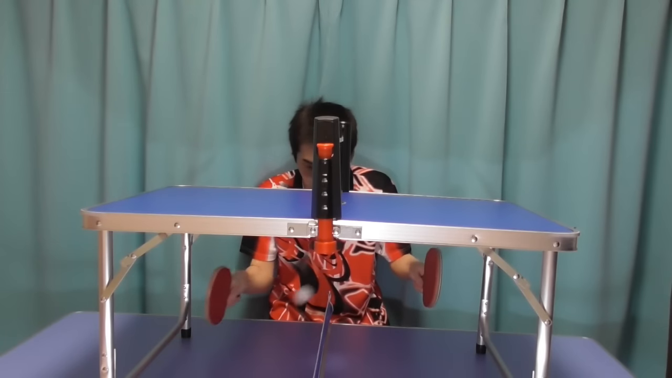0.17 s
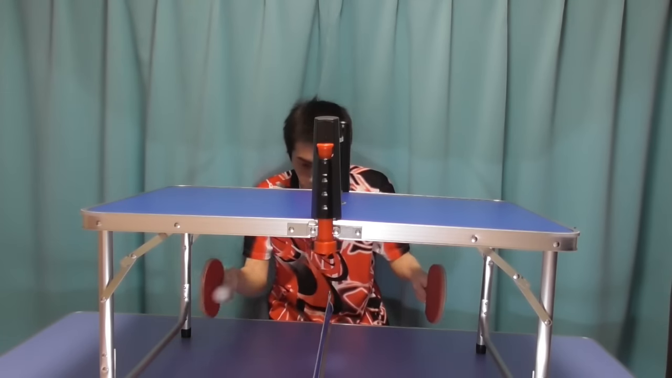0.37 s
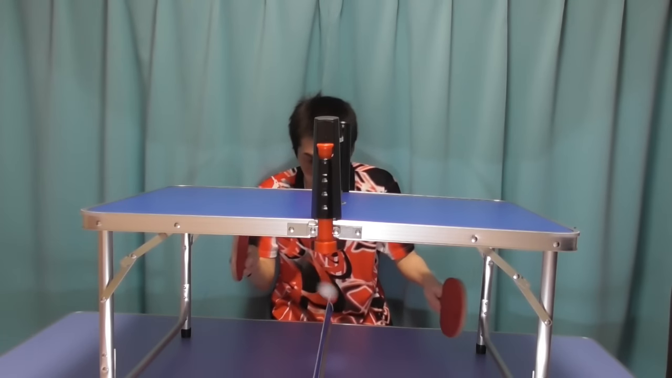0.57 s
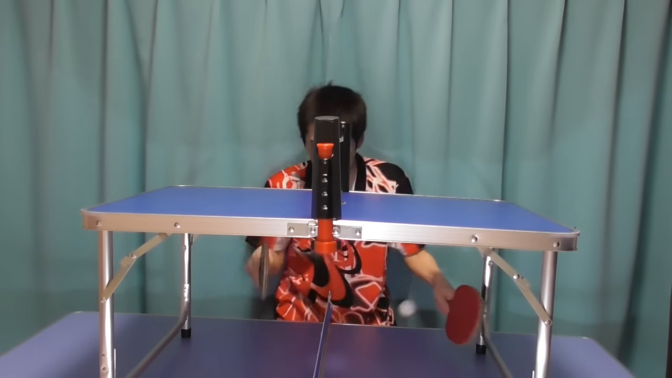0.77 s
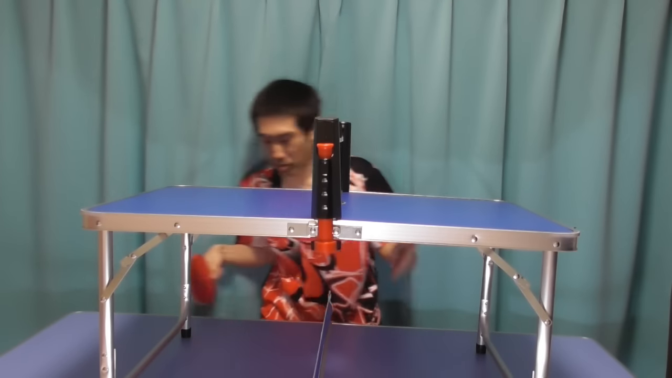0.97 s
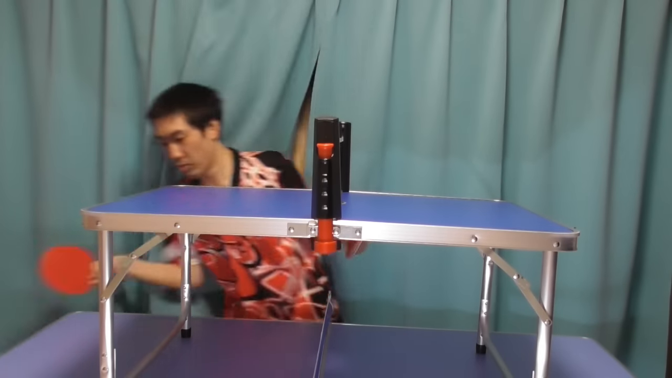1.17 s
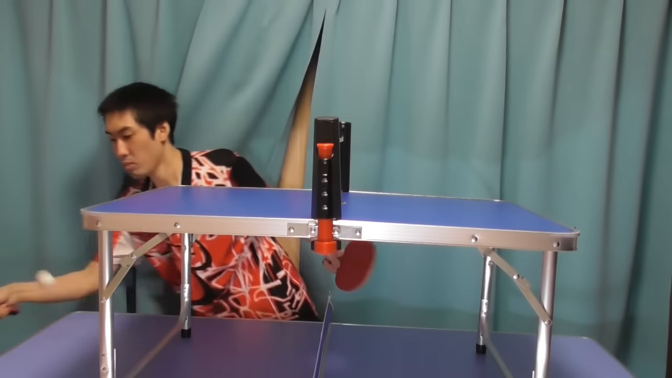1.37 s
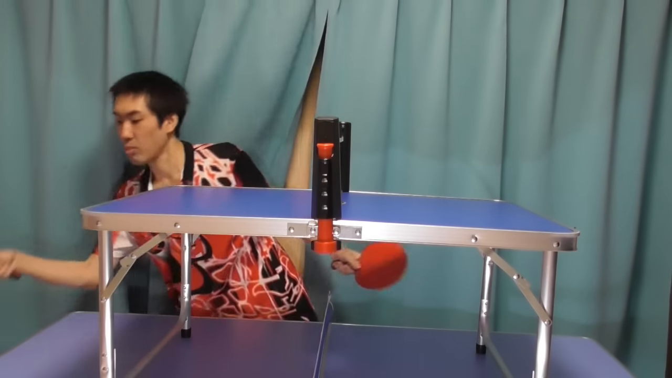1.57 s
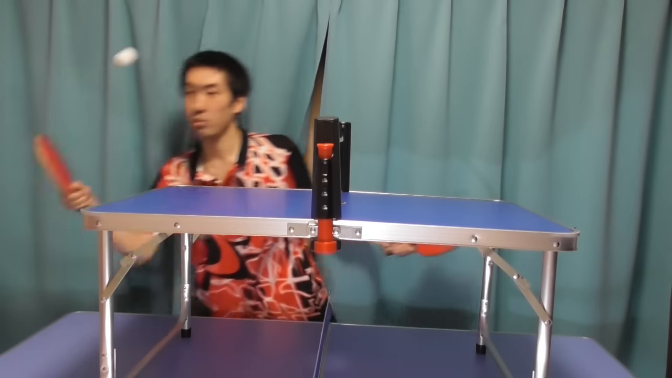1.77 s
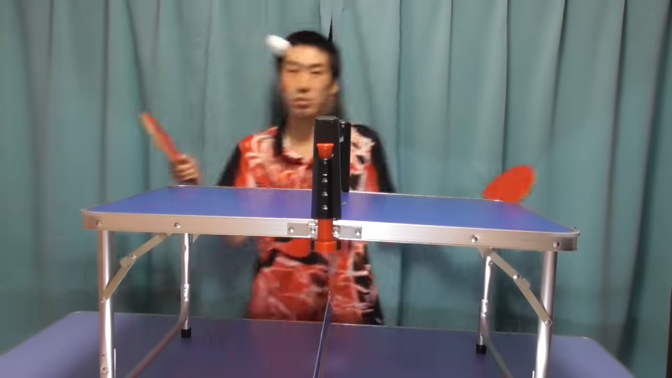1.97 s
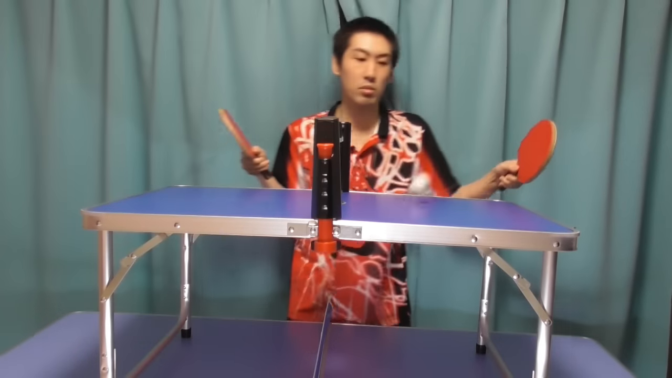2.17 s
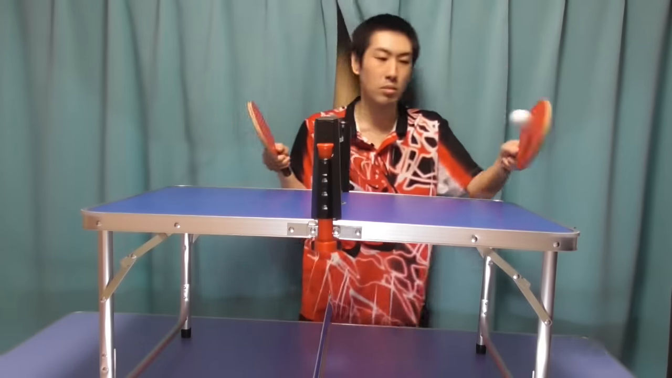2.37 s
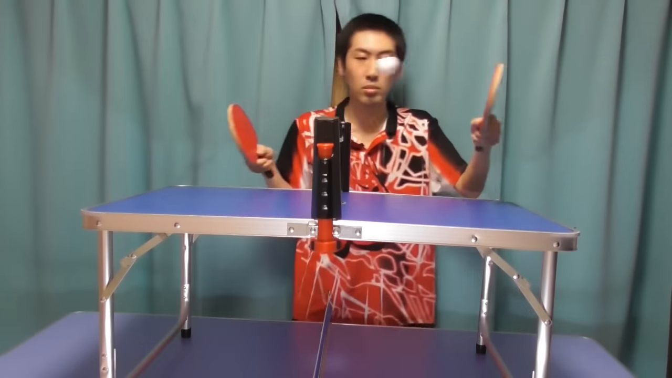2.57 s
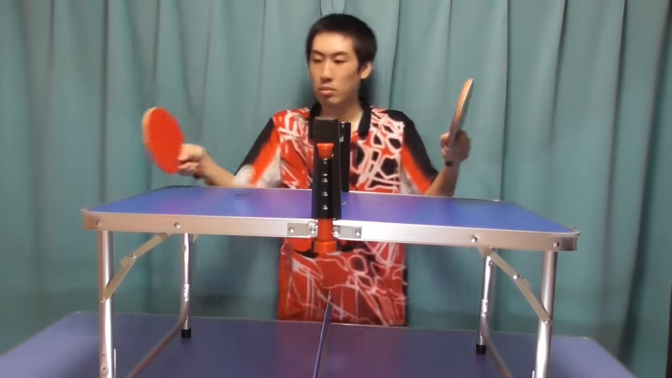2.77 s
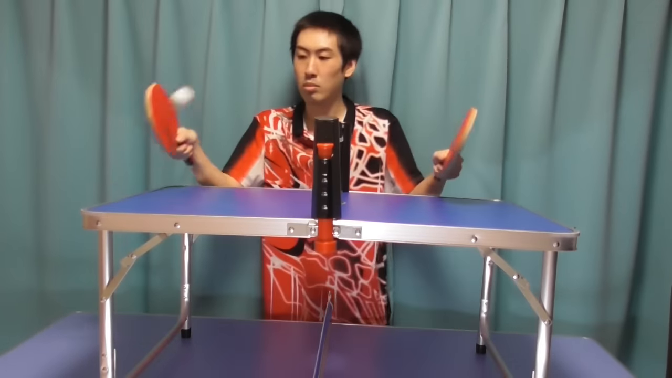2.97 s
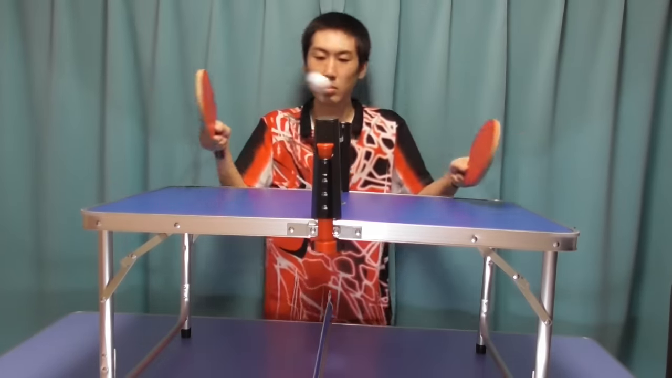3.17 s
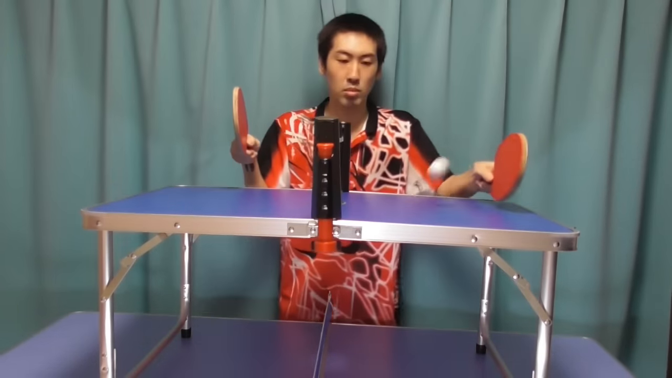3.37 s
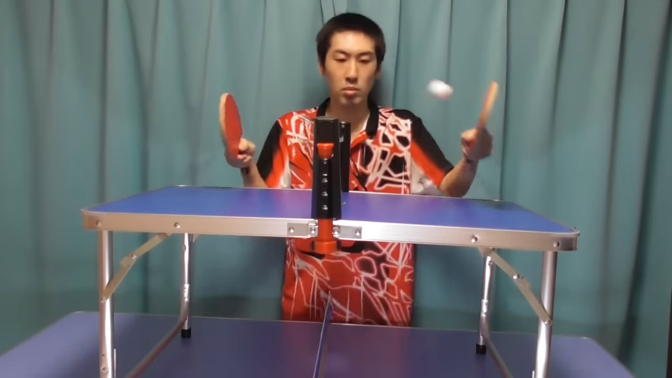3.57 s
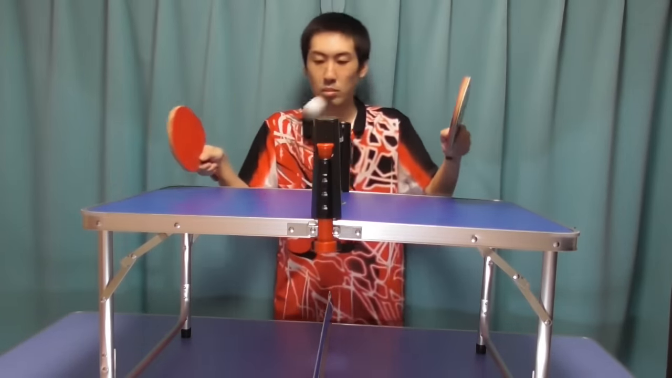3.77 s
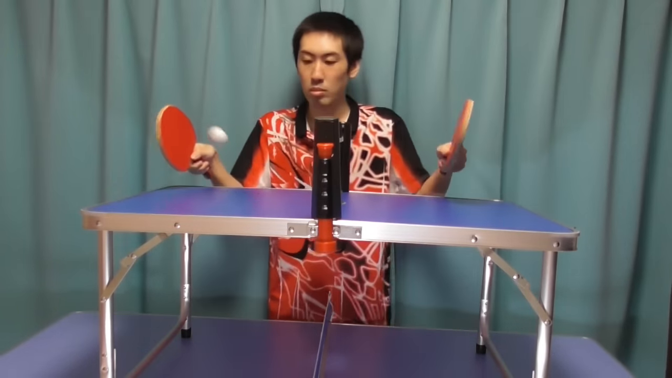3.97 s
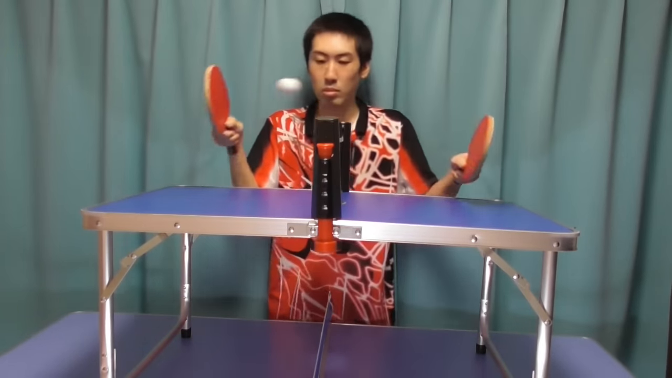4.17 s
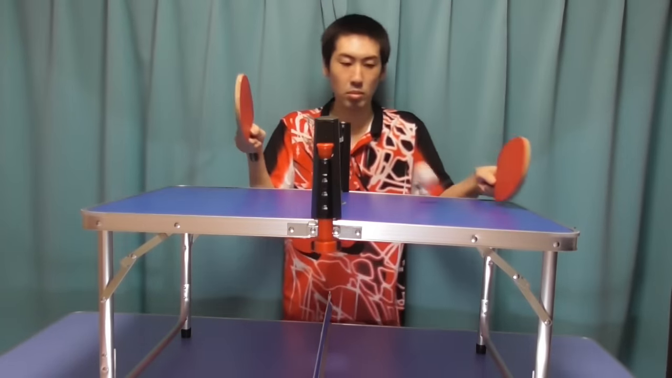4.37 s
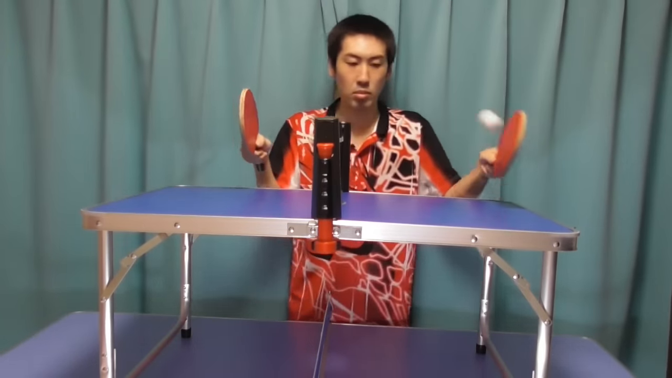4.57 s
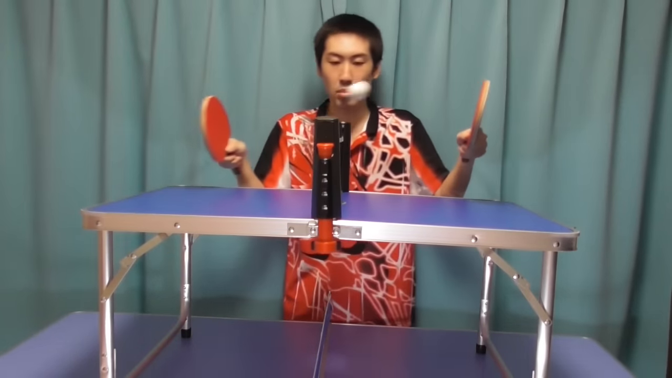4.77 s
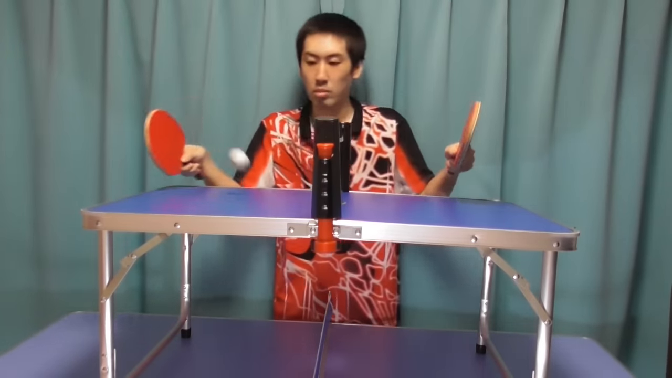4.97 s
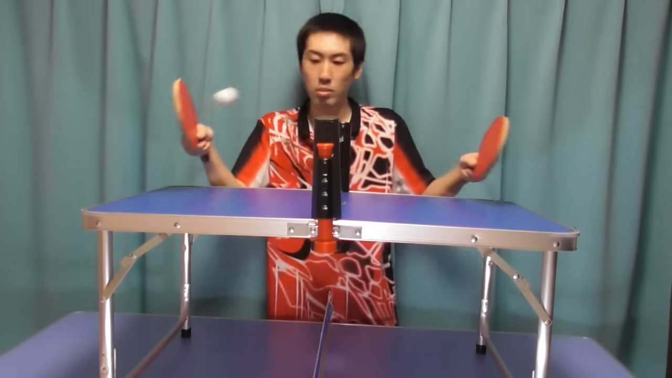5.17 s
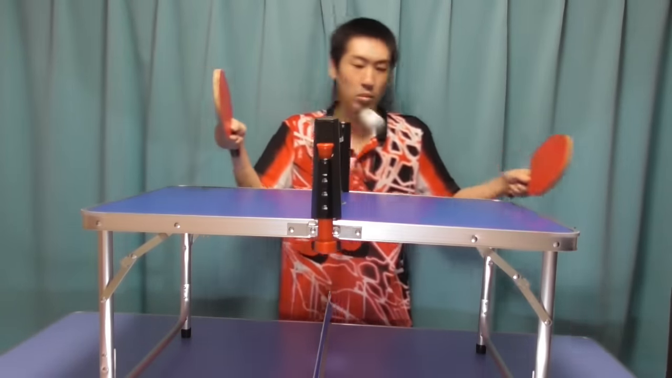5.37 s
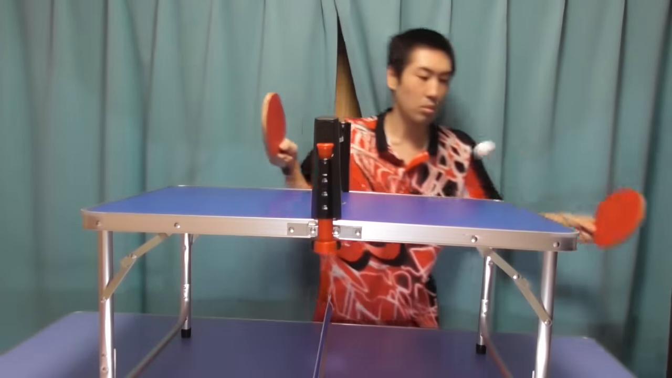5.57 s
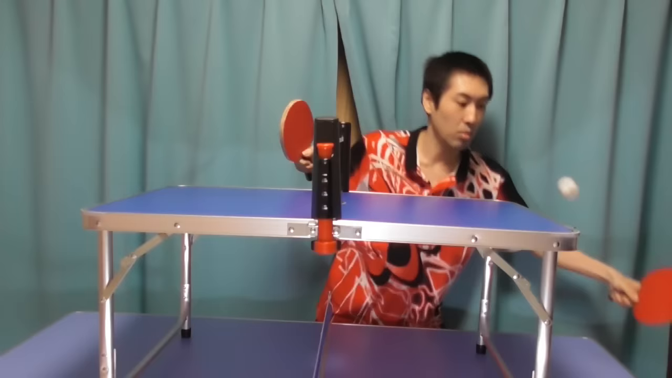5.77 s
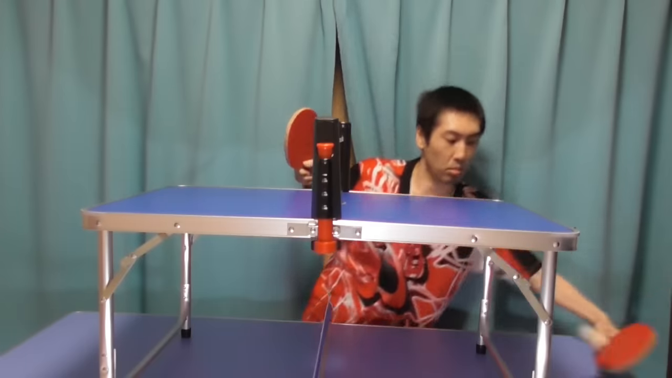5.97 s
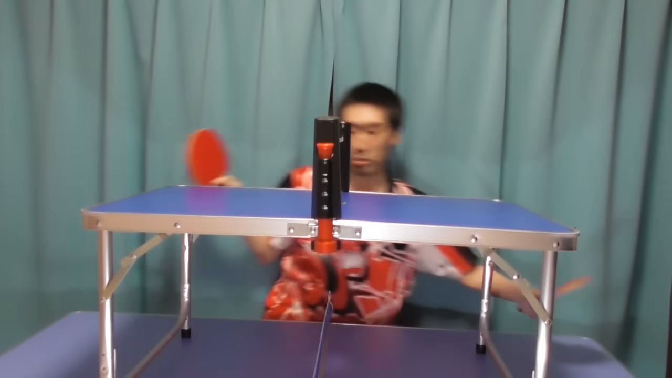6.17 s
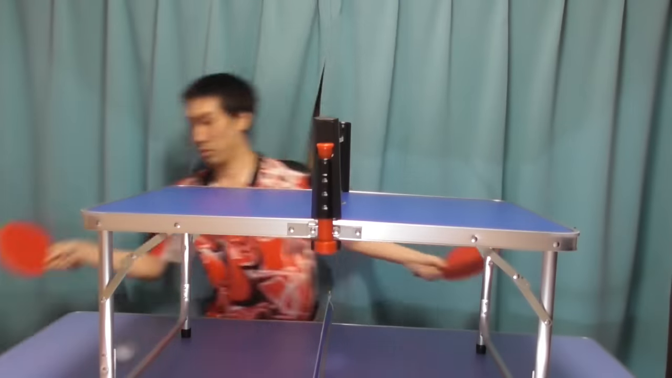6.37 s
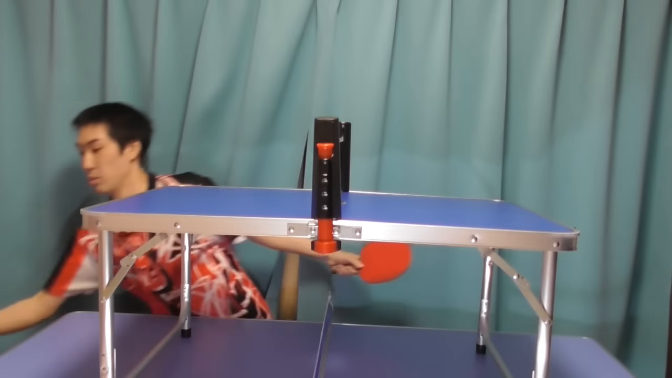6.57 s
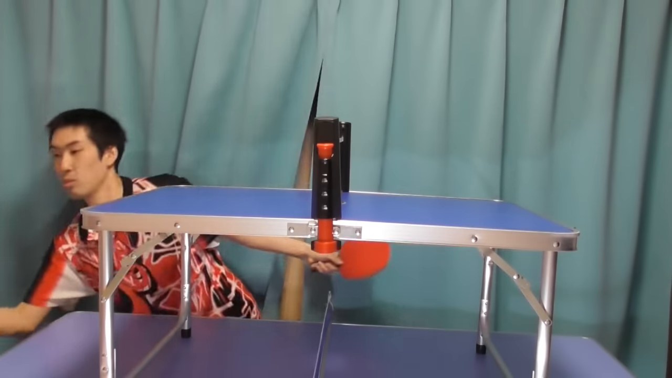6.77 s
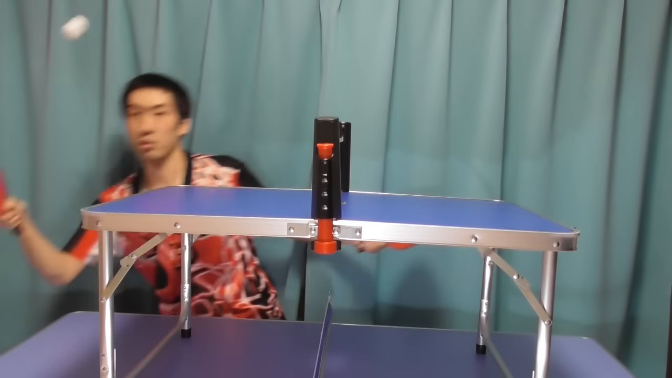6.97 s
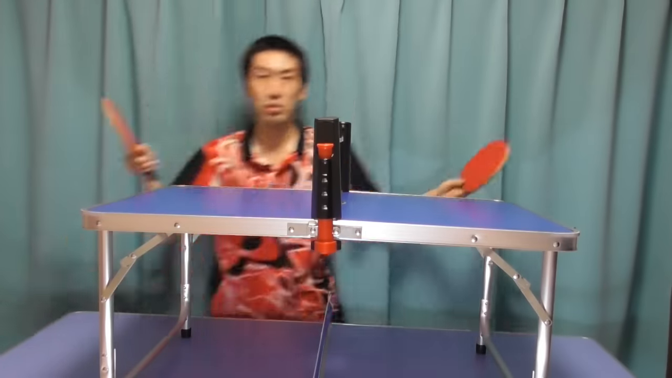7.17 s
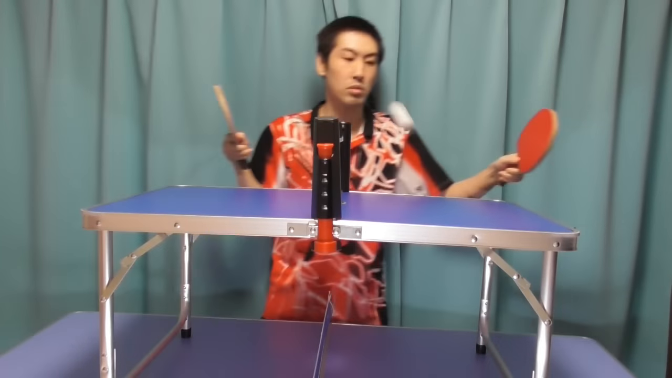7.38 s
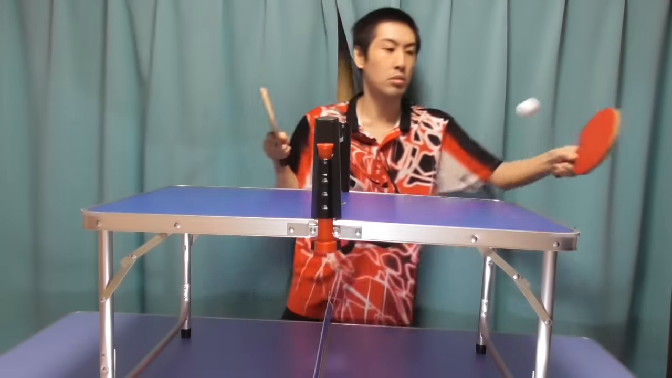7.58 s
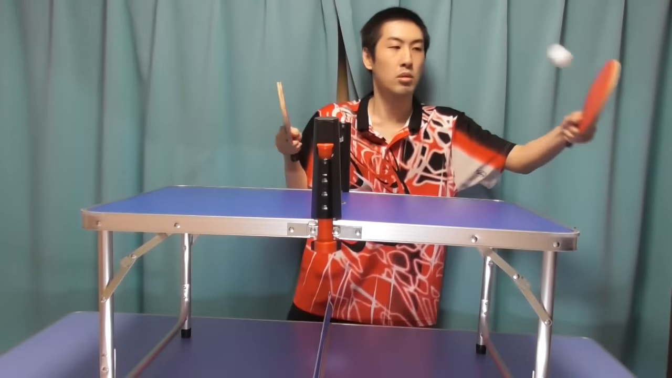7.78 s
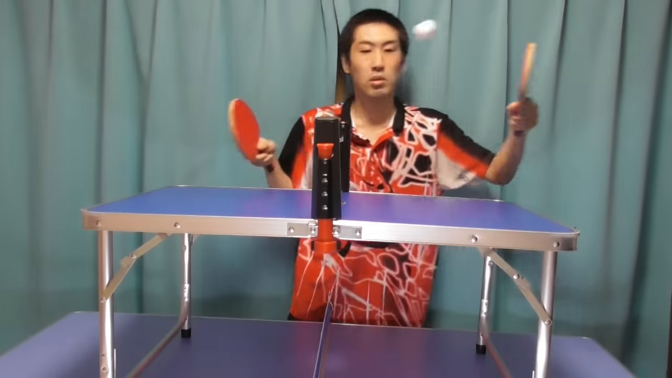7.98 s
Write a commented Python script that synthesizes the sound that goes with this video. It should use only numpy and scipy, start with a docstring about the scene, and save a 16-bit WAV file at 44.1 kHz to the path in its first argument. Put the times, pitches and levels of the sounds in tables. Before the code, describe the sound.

One player rallies a hollow plastic ball between two paddles in a small curtained room. Bright clacking table bounces, about two a second at first and slightly slower later, alternate with much softer, rounder paddle knocks. Wide reaches bring stronger paddle hits and a shirt rustle. Short room echoes follow each blow; a close stereo camera microphone adds faint hiss, hum and ticking.

```python
"""The tail of a soft, round paddle knock comes first, over a faint hum and ticking; then a ball hits a table.
One player rallies a hollow plastic ball between two rubber-faced paddles in a curtained room.
Each bounce rings the folding table's top and frame and the ball's shell; each stroke rings a blade and the shell.
These are struck, decaying modes with room echoes. The player's shirt rustles as he reaches, the room hums
faintly and the camera hisses and ticks: the rustle, hum and hiss are coloured noise."""
import sys
import numpy as np
from scipy import signal
from scipy.fft import rfft, irfft, next_fast_len
from scipy.io import wavfile
from scipy.ndimage import uniform_filter1d, map_coordinates

SR = 44100
rng = np.random.default_rng(int(sys.argv[2]) if len(sys.argv) > 2 else 0)


def decibels_to_gain(level_db):
    """Convert a level in decibels to a linear amplitude gain (20 dB per decade)."""
    exponent = np.asarray(level_db, float) / 20
    return 10 ** exponent


def transcribe(u):
    """Save the signal u as a 16-bit wav file named by the first command-line argument.

    u: samples, shape (n,) or (channels, n), limited to [-1, 1]; the rate is SR.
    q: integer samples, one column per channel.
    """
    v = np.clip(np.atleast_2d(u).T, -1, 1)
    q = np.round(v * 32767).astype(np.int16)
    wavfile.write(sys.argv[1], SR, q)


N = 354108  # length in samples

HIT = np.arange(int(0.6 * SR)) / SR  # the time within one blow, in seconds
HEAD = 1300  # samples at the start of a blow over which its level is set
TOP_HZ = 15800  # noises and echoes hold nothing above this
LOW_CUT = signal.butter(2, 45, "high", fs=SR)  # small ringing things radiate no deep bass


def unit(x, head=None):
    """Scales a sound to rms 1 over its first head samples, or over all of it."""
    return x / np.sqrt(np.mean(x[..., :head] ** 2) + 1e-20)


def along(points, hz):
    """Reads a curve of (Hz, value) points on a log frequency axis."""
    f, v = np.transpose(points)
    return np.interp(np.log(hz + 1), np.log(f + 1), v)


def wobble(rate):
    """A smooth random curve with rate random knots a second."""
    knots = rng.standard_normal(int(N * rate / SR) + 4)
    return map_coordinates(knots, [np.arange(N) * rate / SR])


def paired(pair, spectrum, alike):
    """Colours two noises and mixes them into a left and right of a given likeness at each frequency."""
    length = pair.shape[1]
    hz = np.fft.rfftfreq(length, 1 / SR)
    turn = np.arccos(np.clip(along(alike, hz), -1, 1)) / 2
    colour = decibels_to_gain(along(spectrum, hz)) * (hz < TOP_HZ)
    mid, side = irfft(rfft(pair) * colour * [np.cos(turn), np.sin(turn)], length)
    return np.array([mid + side, mid - side])


def ring(modes, scatter_db, attack):
    """Modes struck once at new strengths, pitches and phases, rising over attack seconds; rms 1 over the head."""
    hz, db, t60 = np.transpose(modes)[..., None]
    strength, detune, phase = rng.standard_normal((3, len(modes), 1))
    swing = np.sin(2 * np.pi * hz * (1 + 0.012 * detune) * HIT + phase)
    fading = decibels_to_gain(db + scatter_db * strength - 60 * HIT / t60)
    return unit((fading * swing).sum(0) * (1 - np.exp(-HIT / attack)), HEAD)


def with_echoes(dry, echoes, stretch):
    """Adds delayed copies of a blow; each delay is multiplied by its own stretch."""
    copies = [decibels_to_gain(db) * np.pad(dry, (round(abs(delay * k) * SR), 0))[:len(HIT)]
              for (delay, db), k in zip(echoes, stretch)]
    return dry + sum(copies)


# How long echoes last in the room. Each row: frequency in Hz, time to fall by 60 dB in seconds.
ROOM_FADE = [(100, 0.43), (350, 0.22), (900, 0.2), (2400, 0.2), (6400, 0.15), (14000, 0.1)]
# How alike the echoes are on both sides. Each row: frequency in Hz, left-right likeness (1 = same, -1 = opposite).
ECHO_LIKENESS = [(100, .93), (600, 0.87), (1100, .7), (1800, 0.8), (3000, 0.94), (5000, 0.96), (7800, .93),
                 (9000, 0.038), (10000, -0.012), (11000, -0.53), (12500, -0.072), (15000, .1)]
# First echoes off table, player and wall. Each row: usual delay in seconds, level in dB against the blow.
FIRST_ECHOES = [(.0016, -2.5), (.0031, -7), (.007, -8.5)]


def place(mix, s, dry, pan_db, wet_db):
    """Puts a blow in the room: first echoes, then a diffuse tail in which each frequency dies at its own speed."""
    dry = signal.lfilter(*LOW_CUT, dry)
    hz, t, z = signal.stft(rng.standard_normal((2, len(HIT))), SR, nperseg=256)
    fading = decibels_to_gain(-60 * t / along(ROOM_FADE, hz)[:, None])
    tail = signal.istft(z * fading, SR, nperseg=256)[1][:, :len(HIT)]
    tail = paired(tail, [(100, 0)], ECHO_LIKENESS)
    tail = tail * (1 - np.exp(-(HIT / 0.0012) ** 2))  # the tail fades in after the blow
    tail = tail / np.sqrt(np.mean(np.sum(tail ** 2, 1)))
    echo = signal.fftconvolve(dry[None], tail, axes=1)[:, :len(HIT)]
    stretch = 1 + 0.2 * rng.standard_normal(len(FIRST_ECHOES))  # each echo's delay varies at random
    dry = with_echoes(dry, FIRST_ECHOES, stretch)
    sound = (dry + decibels_to_gain(wet_db) * echo) / np.sqrt(1 + decibels_to_gain(2 * wet_db))
    sound = sound * np.cos(HIT / HIT[-1] * np.pi / 2)  # reaches silence at the end
    start = SR + round(s * SR)  # the mix begins one second early
    mix[:, start:start + len(HIT)] += sound * decibels_to_gain([[pan_db / 2], [-pan_db / 2]])


# The ball's shell. Each row: frequency in Hz, level in dB before the surface's change, 60 dB fade in seconds.
SHELL_MODES = [(6820, -5, 0.0092), (7380, -0.5, .008), (7940, 2, 0.0056), (8716, -6, 0.013),
               (8550, -8.5, 0.0045), (9850, -4, 0.0069), (11630, -7.5, 0.003), (11740, -1, 0.0025),
               (13000, -15.5, .004), (14200, -16, .003)]


def shell(low_db, long_db, high_db):
    """The hollow ball's click; what it hits changes the low (< 8200 Hz), long and high (> 11000 Hz) modes."""
    modes = []
    for hz, db, t60 in SHELL_MODES:
        db = db + low_db * (hz < 8200) + long_db * (8200 < hz < 8800) + high_db * (hz > 11000)
        modes.append((hz, db, t60))
    return ring(modes, scatter_db=0.5, attack=0.00016)


# The colour of the contact's crack. Each row: frequency in Hz, level in dB per Hz.
CRACK_COLOUR = [(300, -31), (1400, -6), (2100, -1.5), (2700, -6), (3600, 1), (5200, -10.5), (7500, -5),
                (12000, 3), (16000, -28.5)]


def crack():
    """The contact itself: one short coloured pulse."""
    hz = np.fft.rfftfreq(len(HIT), 1 / SR)
    delay = np.exp(-2j * np.pi * hz * 0.0008)
    pulse = irfft(decibels_to_gain(along(CRACK_COLOUR, hz)) * delay, len(HIT))
    return unit(pulse * (HIT < 0.004), HEAD)


# The paddle blade. Each row: multiple of its pitch, level in dB (side modes before the hand's change),
# 60 dB fade in seconds.
BLADE_MODES = [(0.599, -3.5, .009), (0.781, -3.5, 0.012), (1.0, 3, 0.014), (1.199, -5.5, 0.013),
               (1.4, -11, .008), (1.569, -7.5, 0.011)]
# The knock thrown sideways at the walls. Each row: delay in seconds, level in dB against the knock.
WALL_ECHOES = [(.0085, 2), (.019, -3.5)]


def blade(pitch, side_db):
    """A paddle's rounder knock: a main mode, side modes around it, and echoes from the walls."""
    modes = [(pitch * k, db + side_db * (k != 1.0), t60) for k, db, t60 in BLADE_MODES]
    knock = ring(modes, scatter_db=3, attack=0.0015)
    return unit(with_echoes(knock, WALL_ECHOES, [1, 1]), HEAD)


# Paddle strokes. Each row: start in seconds, blade knock in dB, shell click in dB, blade pitch in Hz, hand.
PADDLE_STROKES = [(-.012, -48.5, -57.5, 741, "right"), (0.4126, -43.5, -48.5, 740, "left"),
                  (0.8938, -42.5, -44, 883, "right"), (1.605, -30, -37, 767, "left"),
                  (2.428, -41, -46.5, 761, "right"), (2.9863, -41.5, -48, 735, "left"),
                  (3.539, -43.5, -49, 762, "right"), (4.083, -40.5, -46.5, 717, "left"),
                  (4.585, -43.5, -48.5, 774, "right"), (5.1596, -43.5, -46, 713, "left"),
                  (6.0045, -32.5, -32.5, 795, "right"), (6.7838, -29.5, -34, 757, "left"),
                  (7.7585, -38, -45, 850, "right")]
# The two paddles. Each hand: change of the blade's side modes in dB, change of the shell's long modes in dB,
# left over right in dB (for the blade).
PADDLES = {"left": (-10.5, 0, .1), "right": (3.8, -2.5, -0.96)}


def strokes(mix):
    """Each stroke rings a blade and, brighter and further to the side, the ball's shell with the contact's crack."""
    for s, knock_db, click_db, pitch, hand in PADDLE_STROKES:
        side_db, long_db, pan_db = PADDLES[hand]
        place(mix, s, decibels_to_gain(knock_db) * blade(pitch, side_db), pan_db, wet_db=-3.5)
        click = shell(low_db=-21.5, long_db=long_db, high_db=-6.5) + decibels_to_gain(-12) * crack()
        place(mix, s, decibels_to_gain(click_db) * click, 1.2 * pan_db, wet_db=0.0)


# How alike the noises are on both sides. Each row: frequency in Hz, left-right likeness (1 = same).
NOISE_LIKENESS = [(60, 0.25), (300, 0.55), (1000, 0.87), (1700, 0.94), (7600, 1), (8600, 0.46),
                  (11000, 0.091), (15000, .2)]


def rush(spectrum, patchy_db):
    """Coloured stereo noise of rms 1, with patches of random gain over time and frequency."""
    z = signal.stft(rng.standard_normal((2, next_fast_len(N + 1024))), nperseg=512)[2]
    field = uniform_filter1d(rng.standard_normal(z.shape[1:]), 6, 0, mode="wrap")
    field = uniform_filter1d(field, 10, 1)
    pair = signal.istft(z * decibels_to_gain(patchy_db * unit(field)), nperseg=512)[1]
    return unit(paired(pair, spectrum, NOISE_LIKENESS)[:, :N])


# The camera's tick. Each row: frequency in Hz, level in dB against the other modes, 60 dB fade in seconds.
TICK_MODES = [(2110, -4, 0.03), (2500, -3, 0.0045), (3208, -1, 0.0091), (3680, 3.5, 0.005)]
# The colour of the hiss. Each row: frequency in Hz, level in dB per Hz.
HISS_COLOUR = [(760, -29.5), (1300, -12), (1820, -17), (2060, -2.5), (2680, -11.5), (3920, -3),
               (4730, -14.5), (10600, -3), (16000, -4)]


def camera():
    """A lasting noise hiss, and a faint ringing tick at a fixed rate, strong and weak in turn."""
    rate = 59.94  # ticks per second
    tick_db, hiss_db = -80, -74.5
    at = ((0.0065 + np.arange(int(8 * rate)) / rate) * SR).astype(int)
    ticks = np.zeros(N)
    ticks[at] = decibels_to_gain(-4 * (np.arange(len(at)) % 2) + 2 * rng.standard_normal(len(at)))
    tick = ring(TICK_MODES, scatter_db=1, attack=0.001)[:2000]
    ticking = signal.fftconvolve(ticks, tick)[:N]
    return decibels_to_gain(tick_db) * ticking + decibels_to_gain(hiss_db) * rush(HISS_COLOUR, patchy_db=0.6)


# How hard the shirt rustles as he reaches. Each row: time in seconds, level in dB before small wobbles.
REACHES = [(0.0, -100.5), (0.72, -75), (1.2, -58.5), (1.68, -75.5), (1.97, -65), (2.35, -61), (2.6, -80.5),
           (3.0, -68.5), (3.7, -83.5), (4.63, -73), (5.0, -82.5), (5.7, -63), (5.98, -75), (6.2, -62.5),
           (7.09, -75), (7.25, -62), (7.56, -58.5), (7.8, -68.5), (8.03, -70.5)]


def reaching_db():
    """The player's movement as a rustle level, in straight lines between the points."""
    return np.interp(np.arange(N) / SR, *np.transpose(REACHES))


# The colour of the room's low stir. Each row: frequency in Hz, level in dB per Hz.
STIR_COLOUR = [(15, -24.5), (25, -15), (102, -3), (119, -10), (204, -8.5), (331, -15), (371, -9.5),
               (468, -11), (662, -14), (757, -12), (2500, -38), (3250, -63), (5500, -120)]


def stir():
    """The room's faint hum: low noise that grows with the player's moves and lingers after each bounce."""
    rest_db, moving_db = -65.5, -59.5  # at rest; added by the hardest rustle
    follows = 0.5  # dB per dB of rustle
    linger_db, linger_t60 = -24, 1.1  # against the bounce's knock; seconds to fall by 60 dB
    t = np.arange(N) / SR
    rustle_db = reaching_db()
    power = decibels_to_gain(2 * rest_db) + decibels_to_gain(2 * (moving_db + follows * (rustle_db - rustle_db.max())))
    for s, knock_db, *_ in TABLE_BOUNCES:
        fading_db = knock_db + linger_db - 60 * np.abs(t - s) / linger_t60
        power = power + (t > s) * decibels_to_gain(2 * fading_db)
    return np.sqrt(power) * rush(STIR_COLOUR, patchy_db=1.2)


# The colour of the rustle. Each row: frequency in Hz, level in dB per Hz.
RUSTLE_COLOUR = [(880, -44), (1500, -12.5), (2000, -3.5), (2210, -11), (2440, -2.5), (2740, -11),
                 (3730, -2.5), (5120, -16), (7920, 0.5), (9850, -7.5), (15100, -20), (16000, -20)]


def shirt():
    """Cloth rubbing as he reaches: noise that follows his movement with slow and quick wobbles."""
    level_db = reaching_db() + 1.3 * wobble(12) + 1.2 * wobble(70)
    return decibels_to_gain(level_db) * rush(RUSTLE_COLOUR, patchy_db=1.4)


# The table top's quick modes. Each row: frequency in Hz, level in dB against the others, 60 dB fade in seconds.
TOP_MODES = [(327, -6.5, 0.022), (395, -6, .02), (536, 0, 0.018), (630, -8, 0.028), (741, 3.5, 0.015),
             (892, 5.5, 0.011), (1102, -1, 0.017), (1218, 1, 0.011), (1290, -7, 0.011), (1560, -13, .008)]


def table_top(scatter_db, attack):
    """The knock of the table top: many short modes struck together."""
    return ring(TOP_MODES, scatter_db, attack)


# The table frame's low modes. Each row: frequency in Hz, level in dB against the others, 60 dB fade in seconds.
FRAME_MODES = [(52, -10.5, 0.081), (63.6, -13, 0.94), (103, -5.5, 0.14), (139.4, -5, 1), (150, -6.5, 0.45),
               (170, -9, .15)]


def frame():
    """The loose folding frame's boom: low modes that waver together at random."""
    waver_db = 4.5 * map_coordinates(rng.standard_normal(24), [HIT * 22])  # 22 knots a second
    return decibels_to_gain(waver_db) * ring(FRAME_MODES, scatter_db=2.5, attack=0.01)


# Bounces. Each row: start in seconds, table knock in dB, shell click in dB, long table mode in dB,
# left over right in dB (for the knock).
TABLE_BOUNCES = [(0.3064, -24.5, -28.5, -33, 0.5), (0.724, -25, -26, -42, -1),
                 (1.3398, -23.5, -29.5, -38.5, 0.5), (2.209, -21, -25, -43, -0.5),
                 (2.8263, -24, -22, -38.5, 0.65), (3.3777, -22, -27, -39, -0.6),
                 (3.9279, -23.5, -23.5, -34.5, 1), (4.4434, -23, -26, -36.5, -0.7),
                 (4.9774, -23, -25, -36, 0), (5.5212, -22, -24.5, -35, -0.7),
                 (6.4276, -25.5, -26.5, -37.5, -0.3), (7.4861, -21, -26, -36, 0)]
# While the ball is played on the heavy lower top. Each row: from and to, both in seconds.
LOWER_TIMES = [(0, 1.9), (5.9, 7.0)]
# The two surfaces. Each: change of the shell's modes below 8200 Hz in dB, change of the shell's long modes in dB,
# frame boom over the knock in dB.
TABLE_SURFACES = {"upper": (-1, 0.65, -25), "lower": (-7, 5.6, -23.5)}
# The long mode of the table top. The row: frequency in Hz, level in dB, 60 dB fade in seconds.
LONG_MODE = [(242, 0, 0.33)]


def bounces(mix):
    """Each bounce knocks the table top, rings the shell further to the side, and sets off the frame and long mode."""
    for s, knock_db, click_db, panel_db, pan_db in TABLE_BOUNCES:
        on_lower = any(a < s < b for a, b in LOWER_TIMES)
        low_db, long_db, boom_db = TABLE_SURFACES["lower" if on_lower else "upper"]
        knock = table_top(scatter_db=2.0, attack=0.0029) + decibels_to_gain(-7.0) * crack()
        place(mix, s, decibels_to_gain(knock_db) * knock, pan_db, wet_db=4.5)
        click = shell(low_db, long_db, high_db=-2.0)
        place(mix, s, decibels_to_gain(click_db) * click, 1.6 * pan_db, wet_db=-2.5)
        boom = decibels_to_gain(knock_db + boom_db) * frame()
        panel = decibels_to_gain(panel_db) * ring(LONG_MODE, scatter_db=0, attack=0.0074)
        place(mix, s, boom + panel, pan_db, wet_db=-4.5)


# One-sided low thumps. Each row: start in seconds, peak in dB before the microphones, time to the peak in seconds.
LOW_THUMPS = [(0.7264, -4, 0.00021), (2.827, -7.5, 0.00029), (6.325, -46, 0.003)]


def thumps(mix):
    """A downward pulse that rises and dies away without swinging back, with no echoes."""
    for s, peak_db, length in LOW_THUMPS:
        start = SR + round(s * SR)
        pulse = HIT / length * np.exp(1 - HIT / length)
        mix[:, start:start + len(HIT)] -= decibels_to_gain(peak_db) * pulse


# Faint dull knocks between the blows. Each row: start in seconds, level in dB.
STRAY_KNOCKS = [(1.04, -57), (7.191, -60)]


def stray_knocks(mix):
    """The table top's modes, faintly struck and more uneven."""
    for s, knock_db in STRAY_KNOCKS:
        place(mix, s, decibels_to_gain(knock_db) * table_top(scatter_db=5.0, attack=0.0012), -2.5, wet_db=2.5)


def rally():
    """All blows in the room, on a mix with a second spare at each end for blows that cross its edges."""
    mix = np.zeros((2, N + 2 * SR))
    strokes(mix)
    bounces(mix)
    thumps(mix)
    stray_knocks(mix)
    return mix[:, SR:SR + N]


def scene():
    """All sources together."""
    return rally() + camera() + stir() + shirt()


# Microphone balance. Each row: frequency in Hz, left over right in dB.
PORT_BALANCE = [(100, -0.5), (300, -1.5), (550, -0.5), (1100, 2), (1800, 0.5), (9000, -0.5)]


def microphones(dry):
    """The two microphone ports colour left and right unequally, in opposite directions."""
    size = next_fast_len(N + 4096)
    tilt_db = along(PORT_BALANCE, np.fft.rfftfreq(size, 1 / SR)) / 2
    return irfft(rfft(dry, size) * decibels_to_gain([tilt_db, -tilt_db]), size)[:, :N]


def band_limit(x):
    """A steep low-pass at the top of the band."""
    return signal.sosfilt(signal.butter(12, 16670, fs=SR, output="sos"), x)


def record(dry):
    """The microphones pick up the scene and the input stage smoothly rounds off the highest peaks."""
    ports = microphones(dry)
    rounded = ports / (1 + np.abs(ports / 0.93) ** 6) ** (1 / 6)
    return band_limit(rounded)


dry = scene()
out = record(dry)
transcribe(out)
```